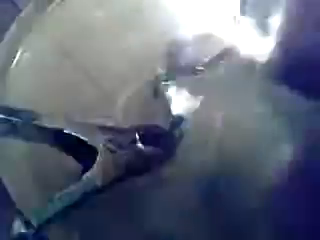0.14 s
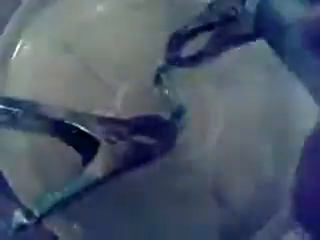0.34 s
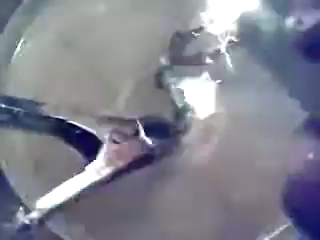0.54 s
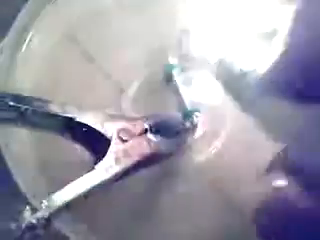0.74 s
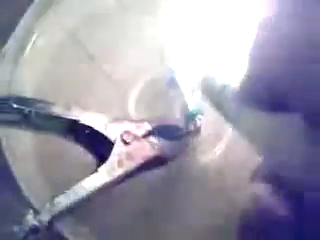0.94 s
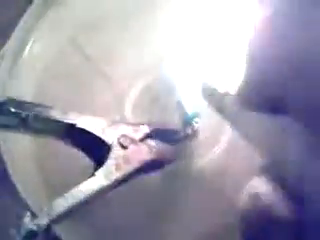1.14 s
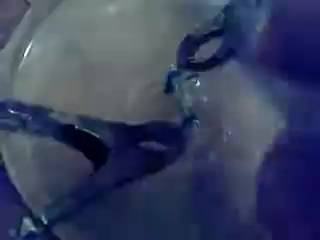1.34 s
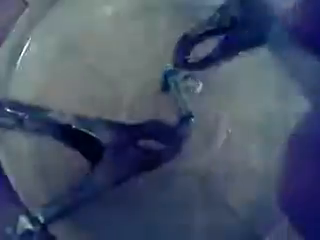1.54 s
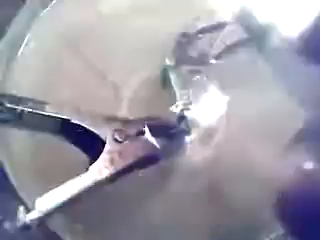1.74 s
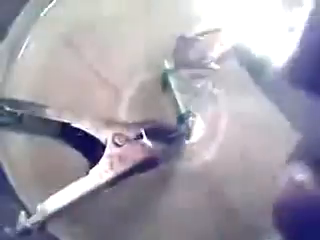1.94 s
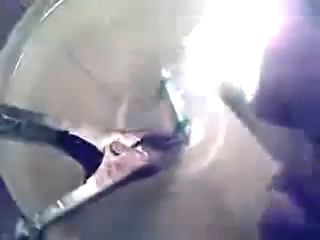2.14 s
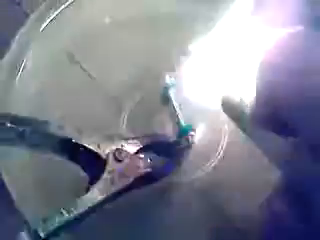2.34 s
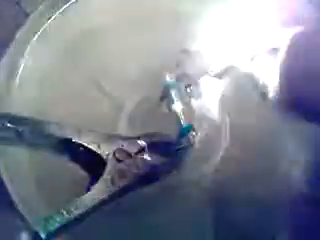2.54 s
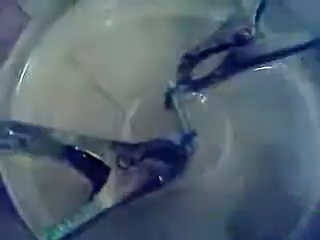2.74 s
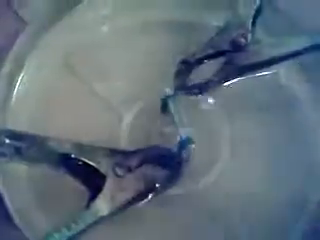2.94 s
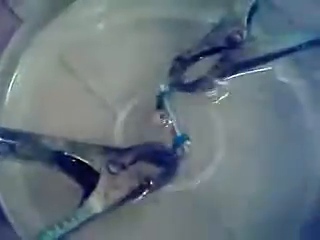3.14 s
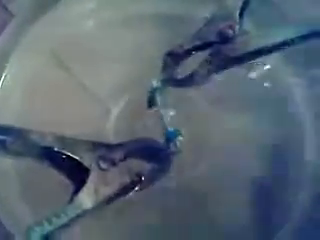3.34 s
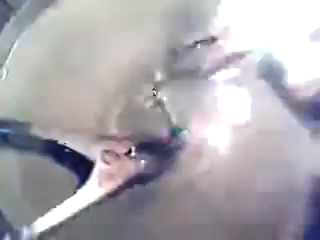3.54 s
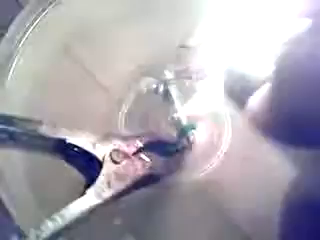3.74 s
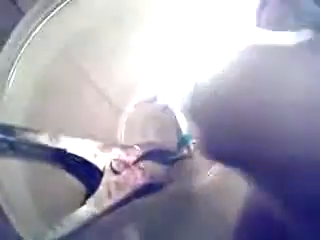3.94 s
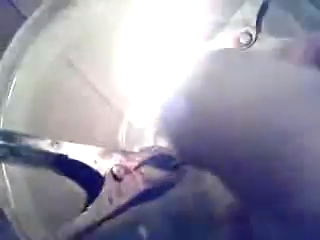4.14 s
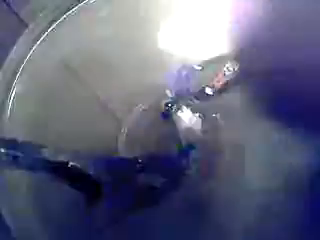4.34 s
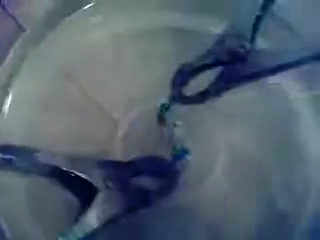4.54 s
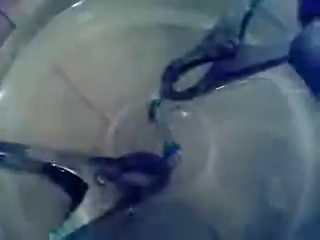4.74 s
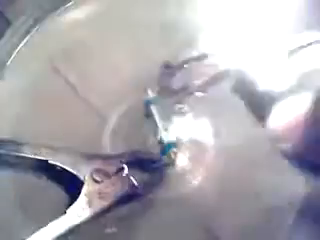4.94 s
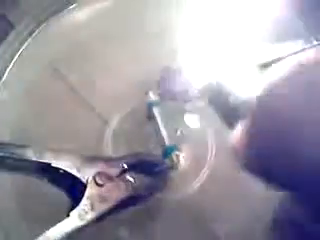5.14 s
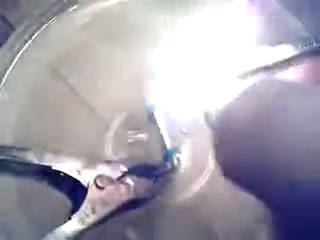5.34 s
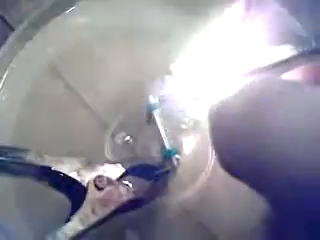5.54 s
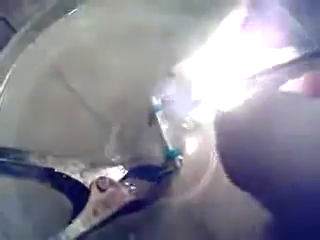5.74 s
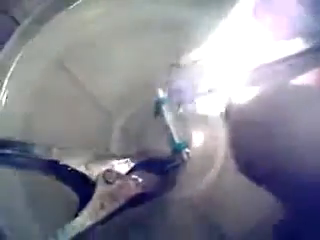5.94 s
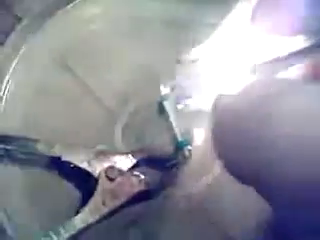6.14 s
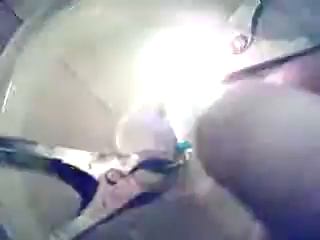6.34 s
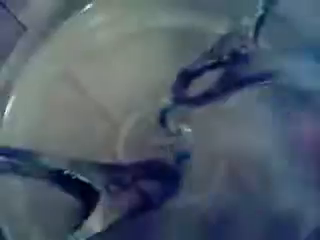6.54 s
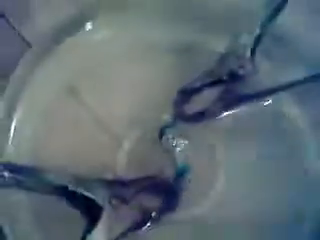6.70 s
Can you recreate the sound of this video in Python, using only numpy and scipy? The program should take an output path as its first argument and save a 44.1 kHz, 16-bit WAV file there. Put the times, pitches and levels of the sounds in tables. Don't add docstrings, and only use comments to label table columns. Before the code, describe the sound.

A sharp bang opens the scene almost at once, its brief hard-room ring fading into grainy hiss. Close lighter clicks begin around 0.6 seconds, with a hard wheel scrape and snap near 0.73. A loud crack follows at 1.27. A longer rising scrape comes at about 1.85, then the loudest crack at 2.58. A firm scrape ends in a heavy snap around 3.66. At 4.36 a duller burn pops, with a second pop right behind it. The wheel scrapes again at 5.02 without a bang; small taps follow around 6 to 6.3, and a final bang with more room sound lands at 6.44. Throughout, tiny bubbles fizz faintly, a distant clock ticks and tocks, and a pulsing electrical buzz and thin whine colour the noise. The cheap, close microphone clips harshly, its background dropping after bangs and slowly returning.

```python
import sys
import numpy as np
from scipy import signal
from scipy.fft import irfft
from scipy.io import wavfile
from scipy.ndimage import uniform_filter1d

SR = 44100
rng = np.random.default_rng(int(sys.argv[2]) if len(sys.argv) > 2 else 0)


def magnitude_from_level(level_db):
    exponent = np.asarray(level_db, float) / 20
    return 10 ** exponent


def unload_audio(sound):
    columns = np.transpose(np.atleast_2d(sound))
    steps = np.round(np.clip(columns, -1, 1) * 32767)
    wavfile.write(sys.argv[1], SR, steps.astype(np.int16))


N = 298557
LOW_RATE, MIDDLE_RATE = 8000, 11025

# start in seconds, crack level in dB, crack pitch in Hz,
# level of the suction behind the front in dB, room level in dB.
BUBBLES = [
    (.01472, 10, 3400, 13, -18),
    (1.27075, 17, 3250, 6.5, -17),
    (2.57765, 18, 2680, 5.5, -17.5),
    (4.3612, 8, 2230, 6, -21),
    (4.3951, 11.5, 2230, 0, -33),
    (6.4429, 15, 2650, 8, -14.5),
]


def evened(x):
    return x / np.sqrt(np.mean(x ** 2) + 1e-20)


def read(points, hz):
    f, value = np.transpose(points)
    return np.interp(np.log(hz + 1), np.log(f + 1), value)


def add(mix, s, sound):
    part = mix[round(s * SR):][:len(sound)]
    part += sound[:len(part)]


def ring(hz, t60, length=.08):
    t = np.arange(round(length * SR)) / SR
    return np.sin(2 * np.pi * hz * t) * magnitude_from_level(-60 * t / t60) * np.minimum(t * hz, 1)


def body(x, modes):
    out = np.zeros(len(x))
    for k, (hz, width, db) in enumerate(modes):
        r = np.exp(-np.pi * width / SR)
        mode = signal.lfilter([1], [1, -2 * r * np.cos(2 * np.pi * hz / SR), r * r], x)
        out += (-1) ** k * magnitude_from_level(db) * np.sqrt(width) * evened(mode)
    return evened(out)


def room_tail():
    # frequency in Hz, density in dB per Hz.
    colour = [(50, -24), (195, -14.5), (253, -1.5), (330, -10), (900, -7), (1400, -3.5), (4000, -8),
              (5200, -47.5)]
    # frequency in Hz, t60 in seconds.
    decay = [(100, .3), (260, .39), (700, 0.33), (1800, 0.34), (3000, 0.27), (4000, 0.32)]
    clumps = magnitude_from_level(2.7 * evened(uniform_filter1d(rng.standard_normal(SR // 2), 90)))
    hz, t, z = signal.stft(clumps * rng.standard_normal(SR // 2), SR, nperseg=512, noverlap=384)
    z = z * magnitude_from_level(read(colour, hz)[:, None] - 60 * t / read(decay, hz)[:, None])
    tail = signal.istft(z, SR, nperseg=512, noverlap=384)[1]
    rise = np.clip(np.arange(len(tail)) / SR / 0.018, 0, 1)
    return rise * tail / np.std(tail[:SR // 20])


def bangs():
    # delay in seconds, level in dB, pitch in Hz.
    echoes = [(.0019, -2, 2800), (.0033, 3, 1900), (.0043, -1, 1600), (.0058, -6.5, 2200),
              (.0082, -3, 1500), (0.0096, -8, 1900), (.014, -12, 900)]
    # frequency in Hz, width in Hz, level in dB.
    bowl = [(280, 40, -1.5), (593, 450, -1), (1140, 550, -3.5), (1620, 196, -7.5), (2400, 170, -12),
            (3250, 2000, -4.5)]
    out = np.zeros(N)
    t = np.arange(SR // 20) / SR
    for s, crack_db, crack_hz, suction_db, room_db in BUBBLES:
        swell_db = crack_db + 78 - .04 * crack_hz
        add(out, s - .004, magnitude_from_level(swell_db) * np.exp(-abs(t - .004) / .0003))
        add(out, s, magnitude_from_level(crack_db) * ring(crack_hz, .0055))

        lag_s = .00095 - .00008 * max(suction_db - 7, 0)
        suction_s = .0012 + .00012 * suction_db
        swing = (t / suction_s - 1) * np.exp(-(t / suction_s) ** 2 / 2.76)
        add(out, s + lag_s, magnitude_from_level(suction_db) * swing * np.minimum(t / 0.00021, 1))

        detunes = rng.uniform(0.96, 1.02, len(echoes))
        for (late, db, hz), detune in zip(echoes, detunes):
            add(out, s + late * detune, magnitude_from_level(room_db + 19 + db) * ring(hz * detune, 0.0095))
        rattle = body(rng.standard_normal(len(t)), bowl) * magnitude_from_level(-60 * t / 0.044)
        add(out, s, magnitude_from_level(room_db + 14) * rattle * np.minimum(t / 0.0018, 1))
        add(out, s, magnitude_from_level(room_db) * room_tail())
    return out


def lighter():
    # teeth catch in seconds, wheel slips in seconds,
    # scrape at the catch in dB, scrape at the slip in dB, grip in dB.
    turns = [
        (.7095, .722, -24, -27, -16),
        (.727, .741, -22, -11, -14),
        (1.832, 1.864, -36, -14, -9),
        (3.645, 3.667, -28, -12, -5),
        (5.0115, 5.028, -19, -16, -5),
    ]
    # frequency in Hz, width in Hz, level in dB.
    case_modes = [(1500, 500, -7), (2200, 400, 2), (2880, 500, 1), (3890, 800, -2.5)]
    # frequency in Hz, width in Hz, level in dB.
    grip_modes = [(239, 150, -1.1), (566, 300, 0), (1080, 400, -1.9)]
    catch_db_per_s, slip_db_per_s, spin_db_per_s = 9000, 2400, 550
    spin_db = -19
    t, out = np.arange(N) / SR, np.zeros(N)
    teeth = rng.random(N) < 1800 / SR
    slips = teeth * magnitude_from_level(3.0 * np.minimum(rng.exponential(1, N), 4)) * rng.choice([-1, 1], N)
    case, grip = body(slips, case_modes), body(slips, grip_modes)
    steady = np.sqrt(uniform_filter1d(case ** 2, 260) + .2)
    for catch, slip, catch_db, slip_db, grip_db in turns:
        turn_db = np.interp(t, [catch, slip], [catch_db, slip_db])
        turn_db -= catch_db_per_s * np.maximum(catch - t, 0)
        after = np.maximum(t - slip, 0)
        scrape = magnitude_from_level(turn_db - slip_db_per_s * after)
        spin = (after > 0) * magnitude_from_level(slip_db + spin_db - spin_db_per_s * after)
        out += (scrape + spin) * (case + magnitude_from_level(grip_db) * grip) / steady
    return out


def clicks():
    # start in seconds, peak in dB, pitch in Hz.
    light_taps = [(0.6125, -19, 2400), (.755, -28, 2900), (0.6536, -38, 2364), (0.678, -31, 2400),
                  (.693, -31, 2300), (.701, -30, 3000), (1.0206, -31.5, 2930), (1.076, -29.5, 2310),
                  (1.6886, -34.5, 3480), (1.811, -37, 2700), (1.8155, -27, 3800), (1.816, -31, 1950),
                  (2.2812, -40, 2010), (2.4105, -28, 2790), (3.8586, -30.5, 2325), (3.9946, -30, 2290),
                  (4.2773, -38, 2270), (4.8284, -35.5, 2930), (4.903, -35, 2000), (4.925, -35, 1640),
                  (4.9671, -37, 1960), (5.1652, -35, 3450), (5.9772, -36, 1810), (6.0272, -31, 2360),
                  (6.102, -30, 3424), (6.123, -33, 2380), (6.245, -33, 3000), (6.286, -29, 2700),
                  (6.3205, -31, 2120)]
    # start in seconds, peak in dB, pitch in Hz.
    wheel_snaps = [(.7105, -20, 2400), (.7275, -18, 2200), (.7398, -5, 2600), (.7418, -5, 2300),
                   (1.8545, -11, 2300), (1.8635, -14, 1500), (2.5685, -32, 1500), (2.5765, -21.5, 1760),
                   (3.639, -24, 2600), (3.647, -15, 2100), (3.6505, -14, 2300), (3.658, -9, 2490),
                   (3.6674, -1, 1958), (3.681, -24, 2600), (5.0118, -15, 2900), (5.027, -10, 3000)]
    taps = [(s, db + 3.5, hz, .012) for s, db, hz in light_taps]
    taps += [(*row, .016) for row in wheel_snaps]
    out = np.zeros(N)
    t = np.arange(round(.08 * SR)) / SR
    for s, db, hz, t60 in taps:
        up, down = rng.uniform(1.3, 1.6, 2)
        modes = ring(hz, t60) + 0.55 * ring(hz * up, t60 / 2) - 0.37 * ring(hz / down, t60 / 2)
        noise = rng.standard_normal(len(t))
        spit = (noise - uniform_filter1d(noise, 90)) * magnitude_from_level(-60 * t / t60)
        add(out, s, magnitude_from_level(db) * (modes + .9 * spit))
    return out


def fizz():
    # frequency in Hz, width in Hz, level in dB.
    bubble_modes = [(1200, 500, -3), (2400, 900, 0), (3500, 900, -3)]
    bursts_per_s = 120
    busy = magnitude_from_level(5.0 * evened(uniform_filter1d(rng.standard_normal(N), SR // 4)))
    sizes = magnitude_from_level(4.0 * np.minimum(rng.exponential(1, N), 3))
    bursts = (rng.random(N) < bursts_per_s * busy / SR) * sizes
    return magnitude_from_level(-53) * body(bursts, bubble_modes)


def clock():
    # frequency in Hz, level in dB, t60 in seconds.
    clockwork = [(2600, -0.5, 0.027), (2860, -6.5, 0.024), (1210, -11, 0.027), (4210, -8.5, 0.018)]
    period_s, rebound_s = .9985, .0032
    beat = sum(magnitude_from_level(db) * ring(hz, t60) for hz, db, t60 in clockwork)
    out = np.zeros(N)
    for k in range(7):
        for first_s, db, again in ((.2183, -25, .6), (.6312, -27.5, .8)):
            s = first_s + k * period_s
            add(out, s, magnitude_from_level(db) * beat)
            add(out, s + rebound_s, again * magnitude_from_level(db) * beat)
    return out


def hiss():
    # frequency in Hz, density in dB per Hz.
    hiss_colour = [(30, 2.5), (170, 3), (400, -1.5), (1000, -1.5), (2500, -2), (4000, -4.5)]
    hz, t, z = signal.stft(rng.standard_normal(N), SR, nperseg=1024)
    patches = uniform_filter1d(rng.standard_normal(z.shape), 10, 0)
    patches = evened(uniform_filter1d(patches, 5, 1))
    z = z * magnitude_from_level(read(hiss_colour, hz)[:, None] + 1.5 * patches)
    z = z * (hz < LOW_RATE / 2)[:, None]
    return magnitude_from_level(-43.5) * evened(signal.istft(z, SR, nperseg=1024)[1][:N])


def supply_sag():
    # from and to in seconds before the frame ends, relative size.
    draws = [
        (-.025, -0.02, -.4),
        (-.0115, -0.009, -.6),
        (-.0095, -.0055, 1),
        (-.0035, 0, 1),
    ]
    period_s, first_s = .04994, .0443
    since = (np.arange(N) / SR - first_s) % period_s - period_s
    current = sum(size * ((since > a) & (since < b)) for a, b, size in draws)
    coupling = signal.butter(1, 23, "high", fs=SR)
    return -magnitude_from_level(-40.5) * signal.lfilter(*coupling, uniform_filter1d(current, 30))


def whine():
    # frequency in Hz, width in Hz, level in dB.
    whistles = [(2940, 25, -61), (3995, 12, -62)]
    return sum(magnitude_from_level(db) * body(rng.standard_normal(N), [(hz, width, 0)]) for hz, width, db in whistles)


def gain_control():
    duck_db, recovery_s = 6.5, .73
    t = np.arange(N) / SR
    ducks = [np.exp(-np.maximum(t - row[0], 0) / recovery_s) * (t > row[0]) for row in BUBBLES]
    return magnitude_from_level(-duck_db * np.max(ducks, 0))


def scene():
    close = bangs() + lighter() + clicks()
    quiet = fizz() + clock() + hiss() + supply_sag()
    return (close + gain_control() * quiet + whine())[None]


def convert(x):
    # start in seconds, offset as a fraction of full scale.
    offsets = [
        (.023, -.098),
        (.746, -.057),
        (1.279, -.097),
        (2.582, -.098),
        (3.669, -.098),
        (4.365, -.098),
        (6.46, -.026),
    ]
    block_s, block_start = .127, -.0175
    step, zero = .0071, -.0012
    low = signal.resample_poly(x, 80, 441, window=("kaiser", 2))
    t, offset = np.arange(len(low)) / LOW_RATE, np.zeros(len(low))
    for s, size in offsets:
        end = block_start + block_s * np.ceil((s - block_start) / block_s)
        offset += size * ((t > s) & (t < end))
    level = np.clip(low + 0.0046 + offset, -.88, .9)
    return zero + step * np.round((level - zero) / step)


def raise_rate(low, size, rate, leak):
    bins = np.arange(size // 2 + 1)
    mirrored = np.fft.fft(low)[bins % len(low)]
    return irfft(mirrored * magnitude_from_level(read(leak, bins * rate / size)), size) * size / len(low)


def low_pass(x):
    return signal.sosfilt(signal.butter(12, 15700, fs=SR, output="sos"), x)


def record(dry):
    # frequency in Hz, gain in dB.
    first_leak = [(500, -.2), (2000, -1.5), (3200, -3.5), (4000, -6.5), (4500, -16), (5000, -32),
                  (5300, -50), (5512, -75)]
    # frequency in Hz, gain in dB.
    last_leak = [(4000, 0), (5000, -3), (5512, -6), (6000, -12), (6500, -20), (7100, -35), (7600, -70),
                 (8000, -120)]
    size = 441 * 680
    low = convert(np.pad(dry[0], (0, size - N)))
    middle = raise_rate(low, size * MIDDLE_RATE // SR, MIDDLE_RATE, first_leak)
    x = raise_rate(np.clip(middle, -.9, .9), size, SR, last_leak)[:N]
    return low_pass(np.clip(x, -.935, .935)[None])


dry = scene()
out = record(dry)
unload_audio(out)
```